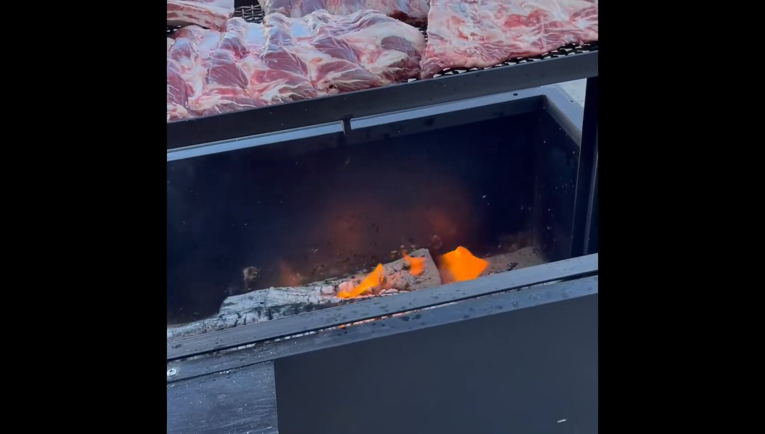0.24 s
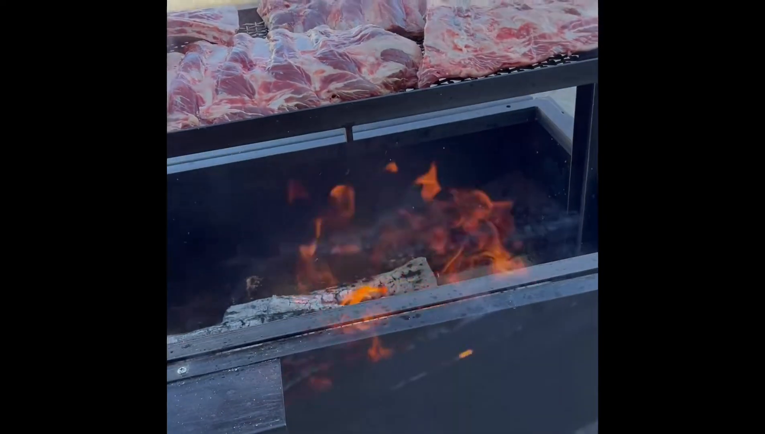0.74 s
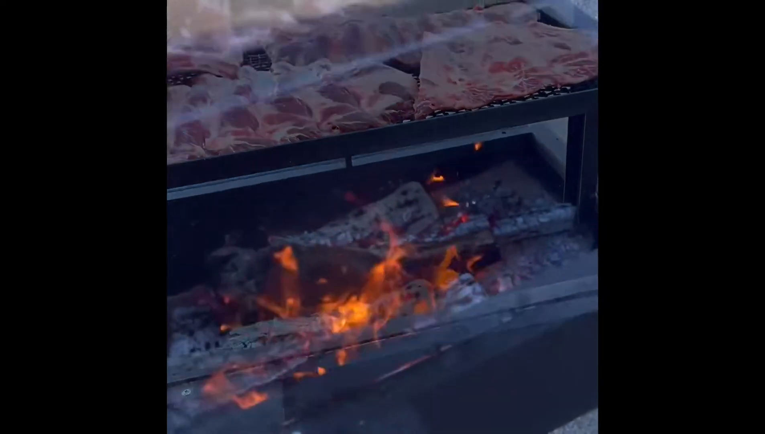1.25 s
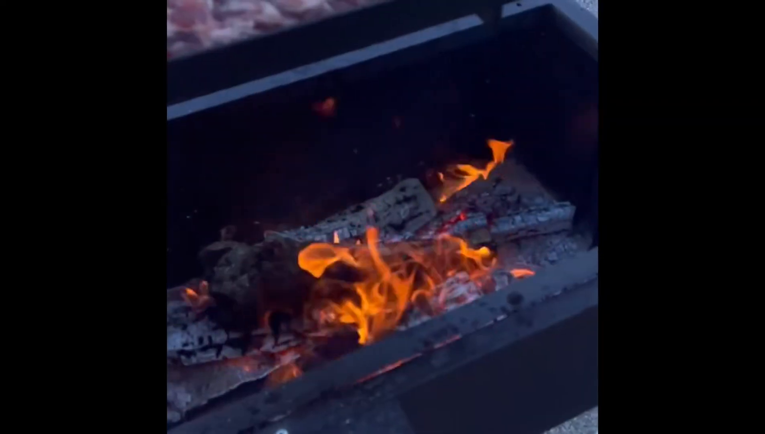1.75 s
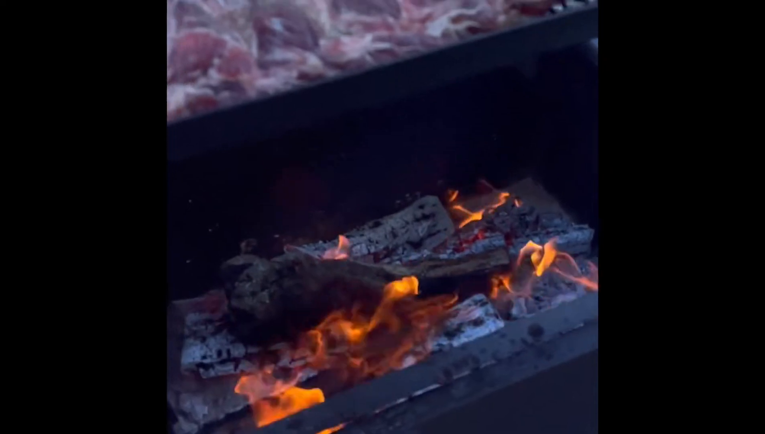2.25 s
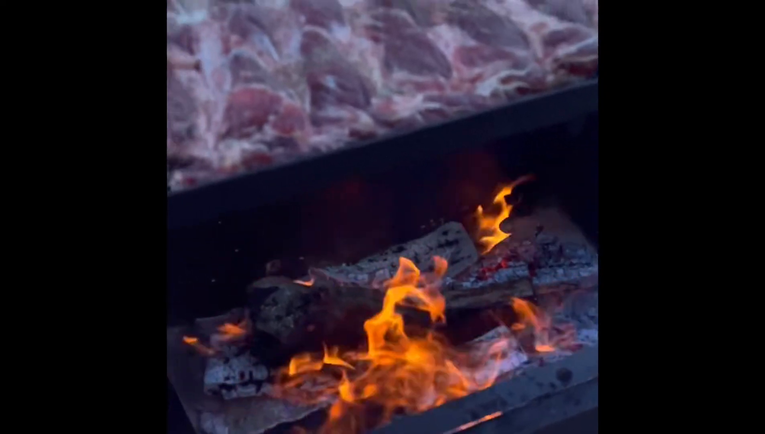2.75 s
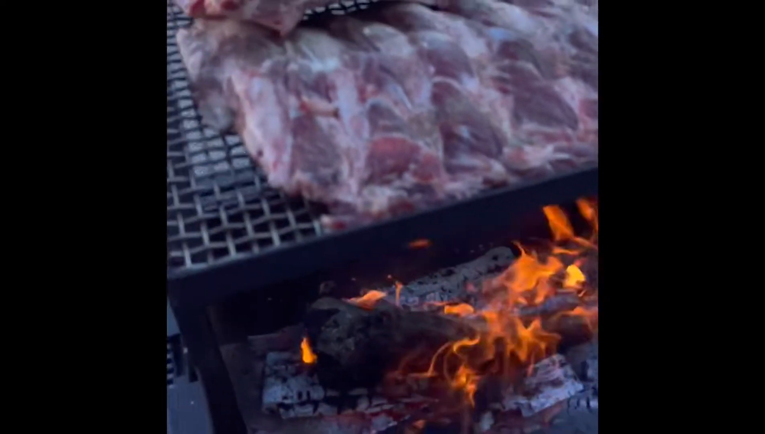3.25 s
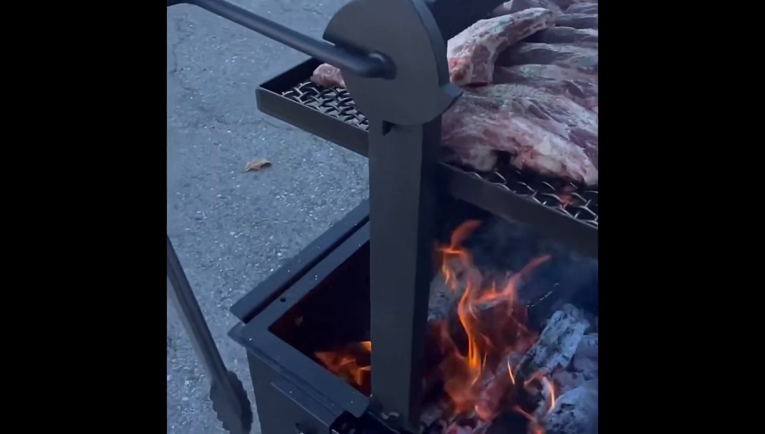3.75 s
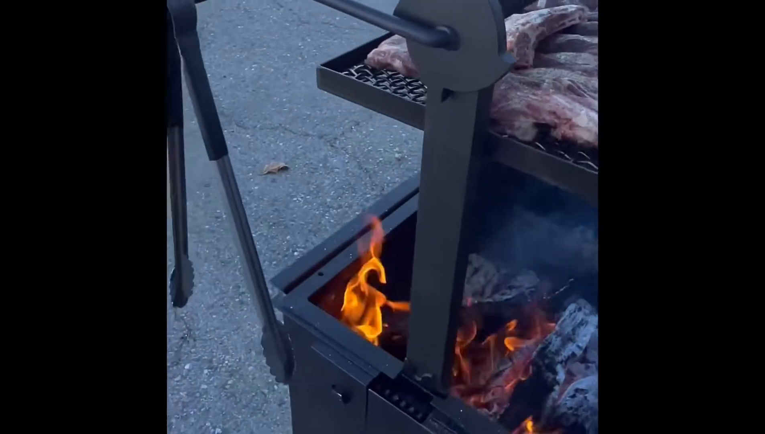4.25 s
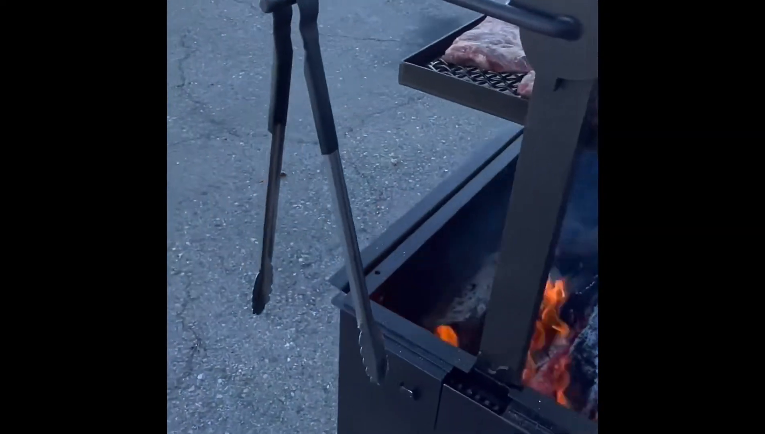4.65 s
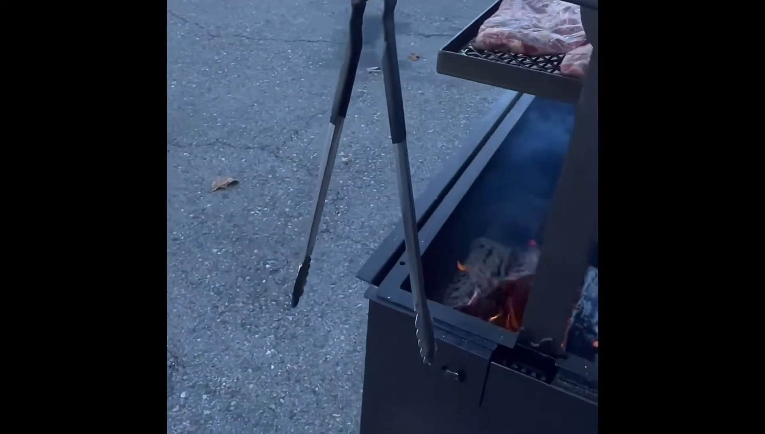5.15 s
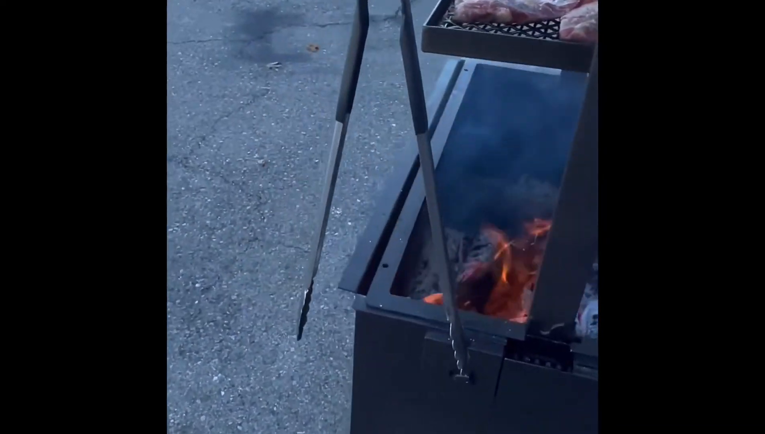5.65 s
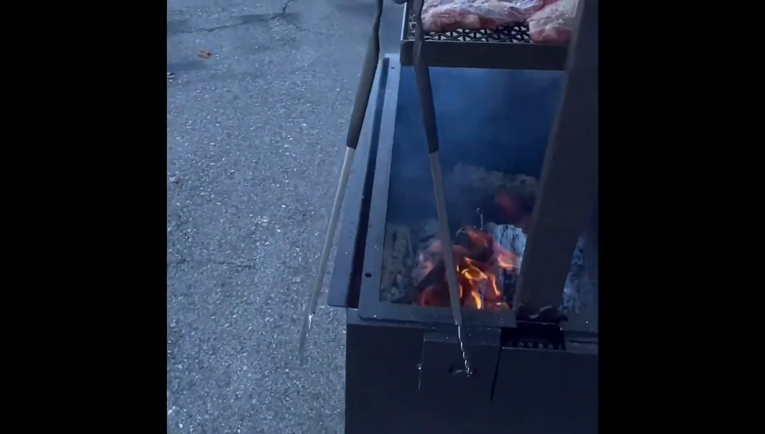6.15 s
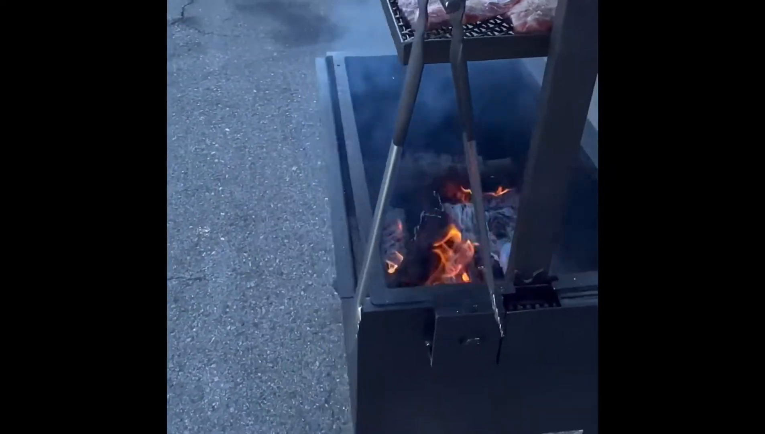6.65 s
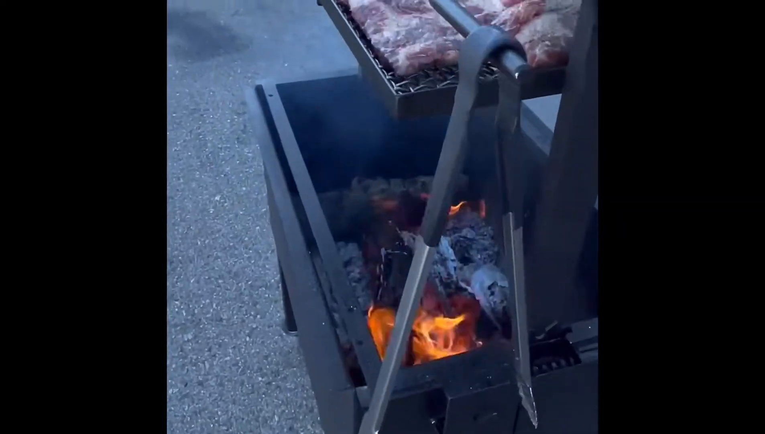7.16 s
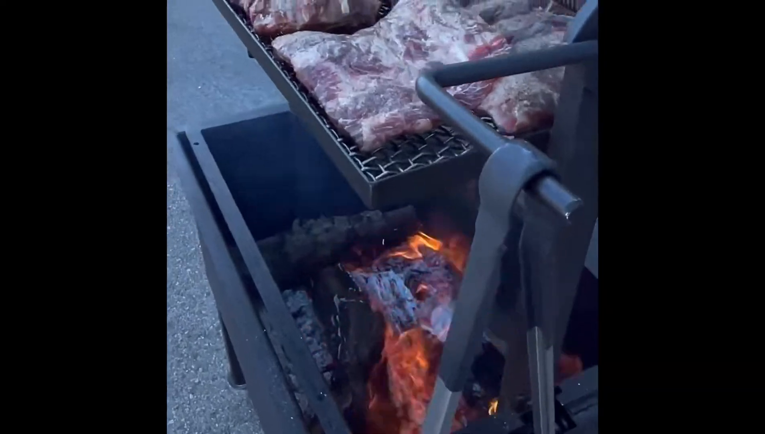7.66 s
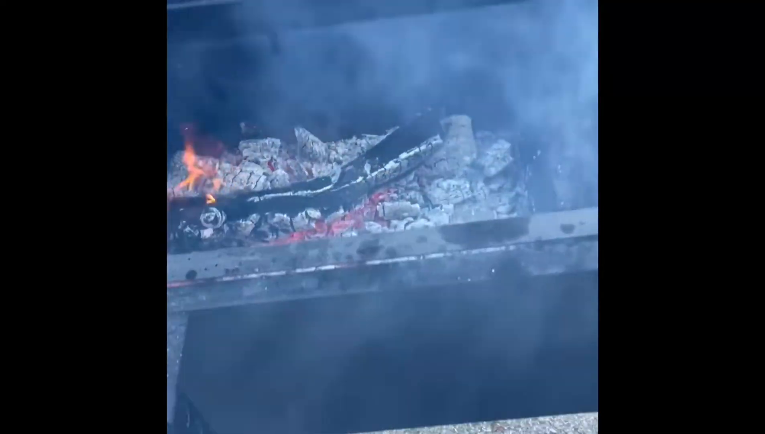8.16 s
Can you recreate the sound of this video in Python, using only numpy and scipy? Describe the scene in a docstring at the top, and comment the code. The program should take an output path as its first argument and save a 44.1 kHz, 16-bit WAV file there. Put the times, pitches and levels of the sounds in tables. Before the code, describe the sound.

Low rumbling flames and a soft draught roar underlie bright, dry wood snaps, tiny ember ticks and a fine hiss. Early crackling is busy; flapping flames follow, with thin gas whistles, a clatter of woody knocks and a quick sizzling spit. Heard close outdoors, first in front, then beside the fire with airier background, finally in front again as the rumble surges. Steel walls add short, faint echoes.

```python
"""A low rumble of flames, a fine hiss and sharp snaps open the sound of logs burning in a steel firebox outdoors.
Shaped noise makes the rumble, the roar, the hiss of sap and fat and the wash of air; swelling noise
and a falling tone make each flap of flame. Impulses and noise bursts through band filters make snaps and knocks,
random taps the ring of the steel; gliding tones make gas whistles and squirts. The listening point switches
at once from the front to the side, later back, which alters the stereo image and the air level."""
import sys
import numpy as np
from scipy import signal
from scipy.fft import rfft, irfft
from scipy.io import wavfile
from scipy.ndimage import uniform_filter1d

SR = 44100
rng = np.random.default_rng(int(sys.argv[2]) if len(sys.argv) > 2 else 0)


def wrap_up_sound(samples):
    """Save the sound to the file named by the first command line argument, as 16-bit audio."""
    columns = np.atleast_2d(samples).T
    # keep every value between -1 and 1, then stretch to whole-number steps
    tamed = np.clip(columns, -1, 1)
    steps = np.round(tamed * 32767).astype(np.int16)
    wavfile.write(sys.argv[1], SR, steps)


N = 370440
TIME = np.arange(N) / SR

# Open air, slow swells: (time [s], level in front of the fire [dB])
BREEZE = [(0, -58.5), (1.25, -61), (2.8, -59.5), (4.2, -59.5), (7.0, -59), (8.4, -60.5)]
# Open air, relative spectrum: (frequency [Hz], density [dB per Hz])
AIR_SPECTRUM = [(100, -4), (300, 1), (550, -3), (1000, -3), (1600, -11), (2400, -11.5), (3500, -14),
                (5500, -16), (8000, -14.5), (12000, -12), (14000, -60)]
# Air rushing briefly through the logs: (time of the centre [s], half length [s], level [dB])
RUSHES = [(6.618, .03, -58), (6.769, 0.011, -57), (6.881, 0.028, -51.5), (7.038, 0.032, -56),
          (7.82, 0.036, -55)]
# That rush, relative spectrum: (frequency [Hz], density [dB per Hz])
RUSH_SPECTRUM = [(250, -6), (600, 5), (1100, -3.5), (2000, -8.5), (4000, -8), (6000, -13), (12000, -38)]
# Gas whistling through cracks:
# (time [s], length [s], first pitch [Hz], last pitch [Hz], level [dB], roughness [0-1])
WHISTLES = [(1.898, 0.073, 3850, 3520, -68, .45), (2.117, 0.058, 3900, 2930, -68, 0.5),
            (2.235, 0.038, 3950, 3500, -69, .5), (2.282, .075, 3250, 2660, -70, 0.3),
            (2.93, .07, 3480, 3100, -75, .7), (7.906, 0.11, 4870, 3600, -68.5, 1)]
# Bursting gas pockets: (time [s], first pitch [Hz], last pitch [Hz], time constant of the fall [s],
# time constant of the fade [s], level before the common gain in squirts() [dB])
SQUIRTS = [(2.662, 5060, 324, .0009, 0.0085, -41), (2.8108, 3850, 109, 0.0019, 0.0038, -35)]
# Shifting log knocking its neighbours:
# (time [s], level over 5 ms [dB], length scale of the push [s], main ring [Hz])
KNOCKS = [(2.67, -48.5, 0.0036, 1810), (2.7917, -46.5, 0.0011, 1690), (2.815, -51, 0.0066, 1640),
          (2.858, -49, .0045, 1780), (2.862, -50, 0.0015, 1920), (2.883, -54, .003, 1940),
          (2.889, -44, 0.003, 1880)]
# Modes of the log: (multiple of the main ring [ratio], bandwidth [Hz], relative level [dB])
LOG_MODES = [(.5, 500, -8), (1, 420, 0), (1.33, 400, -7), (2.1, 1500, -10), (4.4, 5000, -11)]
# Boiling sap: (time [s], level [dB])
BOIL = [(0, -54.5), (.45, -51), (.9, -60), (1.35, -67.5), (2.1, -63.5), (3.15, -66.5), (3.45, -58),
        (3.75, -60.5), (4.6, -59), (5.9, -59.5), (6.7, -69.5), (7.6, -69), (8.4, -72)]
# Hiss of the sap, relative spectrum: (frequency [Hz], density [dB per Hz])
SIZZLE_SPECTRUM = [(600, -14), (1800, -12), (3000, -13), (5000, -16), (6500, -4), (7700, -12), (8600, 1.5),
                   (10800, 1.5), (12000, -4), (12350, -13), (13050, -3.5), (13350, -38), (16000, -41)]
# Bursting bubbles, relative spectrum: (frequency [Hz], density [dB per Hz])
BUBBLE_SPECTRUM = [(700, -11), (1800, -8), (3000, -4.5), (5000, -5.5), (6500, -2), (10500, 2), (12000, 9.5),
                   (13000, -11), (16000, -33)]
# Fat flashing to steam: (start [s], rise [s], hold [s], top level [dB], fade [dB per s])
SPITS = [(.27, 0.054, .26, -52, 70), (3.26, 0.032, 0.026, -39.5, 144)]
# Steam, relative spectrum: (frequency [Hz], density [dB per Hz])
STEAM_SPECTRUM = [(150, 0.5), (450, 1.5), (1300, -15), (2300, -4), (4000, -12), (7500, -14), (9000, -1.5),
                  (11000, 2), (12000, -5), (12500, -5), (15000, -38)]
# Spitting droplets, relative spectrum: (frequency [Hz], density [dB per Hz])
DROPLET_SPECTRUM = [(300, -2), (1300, -2.5), (2400, -3.5), (4000, -9), (7500, -7), (10500, 4), (12000, 3),
                    (14000, -29)]
# Wood snaps at set times, loud and faint: (time [s], level over 5 ms [dB], length scale [s],
# ring of the splinter [Hz], woody body relative to the treble snap [dB])
POPS = [(0.062, -48, .002, 9100, -3), (0.134, -45, 0.0061, 9600, -3), (0.144, -46, 0.0046, 10000, -4),
        (0.206, -44, 0.0012, 9600, -13), (.292, -47, 0.0023, 9660, -18), (0.312, -40, .004, 10300, -28),
        (0.318, -39, 0.0048, 9800, -26), (0.34, -45, 0.0033, 10100, -20), (.386, -39.5, .003, 10500, -33),
        (0.424, -39.5, 0.0051, 10600, -14), (0.491, -40.5, 0.0055, 10300, -10),
        (0.615, -44, .003, 7000, -13), (0.6397, -33, 0.0016, 7040, -15.5),
        (0.712, -44.5, 0.0036, 7500, -12), (0.7186, -41.5, 0.0029, 9600, -7),
        (0.942, -46, 0.0014, 10400, -3), (1.089, -48.5, 0.0035, 10700, -1),
        (1.411, -46.5, 0.0021, 10000, -6), (1.651, -50.5, 0.0026, 4200, -9),
        (1.6867, -32.5, 0.0016, 7700, -14.5), (1.728, -48.5, .0021, 5900, -6),
        (1.81, -49.5, 0.0016, 4300, -4), (1.829, -51, 0.00071, 6860, -8), (1.854, -57, .002, 4200, -7),
        (1.88, -55, .0016, 7500, -14), (1.899, -45.5, 0.0013, 5840, 6), (1.946, -55, 0.0019, 6500, -11),
        (1.989, -57, .001, 7160, -11), (1.992, -51, 0.0038, 7300, 0), (2.029, -47.5, 0.0015, 6700, -17),
        (2.203, -49.5, 0.0017, 7000, -5), (2.261, -51.5, .002, 10500, -22),
        (2.373, -54, 0.0026, 10100, -16), (2.442, -48.5, 0.0054, 6700, -27),
        (2.515, -48.5, 0.0039, 9800, -27), (2.67, -45, 0.0054, 8900, -10), (2.696, -44, 0.0033, 9630, -15),
        (2.702, -39.5, 0.0031, 9450, -13), (2.97, -58, .001, 10600, -18), (2.998, -46, 0.0025, 9900, -18),
        (3.132, -44.5, 0.0011, 11100, -8), (3.231, -57, .001, 6500, -14), (3.347, -52, .0015, 2400, 11),
        (3.519, -53, .0015, 11400, -9), (3.546, -51, .0012, 9700, -20), (3.574, -51, .0012, 9700, -18),
        (3.62, -50.5, 0.0017, 11000, -23), (3.675, -47.5, 0.0012, 10400, -13),
        (4.023, -47.5, 0.004, 6950, -12), (4.07, -51, .0015, 11400, -11), (4.718, -48, .0015, 11300, -22),
        (5.197, -50, 0.0013, 11400, -18), (4.81, -41, 0.003, 10960, -23), (5.131, -43.5, 0.012, 8900, 0),
        (5.4957, -41, 0.00022, 9600, -2), (5.542, -34.5, 0.0019, 10060, -11.5),
        (5.564, -45.5, 0.0035, 3900, 4), (5.579, -49.5, 0.003, 4000, 1), (5.7217, -43.5, 0.0014, 9400, -2),
        (5.728, -46, .002, 4500, -6), (5.7323, -37.5, 0.0015, 4300, -4), (5.7387, -42, .0016, 4230, 0),
        (5.752, -46.5, .0035, 4200, -4), (5.775, -50, .003, 11000, -3), (5.79, -51, .0018, 4180, -8),
        (5.8373, -41.5, 0.00033, 6640, -7), (6.104, -53, 0.0015, 6200, 6), (6.144, -52.5, 0.0019, 6300, 9),
        (6.358, -55, 0.0018, 6200, -10), (6.312, -44, 0.011, 9300, 2), (6.3865, -47, 0.0016, 6260, -9),
        (6.5094, -42.5, 0.0031, 6500, 5), (6.5136, -47, 0.0035, 2580, 6), (6.582, -46, 0.009, 10500, -3),
        (7.088, -38, 0.0016, 11400, -36), (7.16, -48, 0.0025, 4300, -4), (7.487, -49, 0.0051, 11200, -32),
        (7.607, -51, 0.0018, 8060, -18), (7.685, -49.5, 0.0018, 8400, -16), (7.715, -56, .003, 4300, 6),
        (7.747, -52, .004, 4340, 16), (7.77, -37.5, 0.0018, 10550, 2), (8.059, -44, 0.0025, 8900, -9)]
# Flapping flames: (time of the peak [s], level at the peak [dB], half length scale [s],
# edge scale of the flutter [Hz], pitch of the thud at the peak [Hz])
FLAPS = [(1.058, -38.5, 0.0039, 450, 229.8), (1.335, -34.5, 0.0056, 397, 115),
         (1.362, -47, .012, 418, 130.7), (1.427, -38.5, 0.016, 380, 70.5), (1.467, -38.5, 0.012, 614, 330),
         (1.484, -35.5, 0.02, 364, 62.7), (1.626, -51, 0.0065, 520, 330), (1.949, -47, .007, 230, 80),
         (1.992, -41.5, 0.0078, 326, 94.9), (2.135, -45.5, .012, 410, 150.6), (2.18, -39, .012, 159, 68),
         (2.263, -37, 0.0077, 95, 60.2), (2.326, -46, .005, 480, 189.4), (2.365, -47.5, .005, 420, 241),
         (2.45, -50.5, 0.014, 470, 260), (2.535, -41, 0.013, 129, 62.1), (3.374, -44, .023, 130, 55.8),
         (3.775, -31, 0.0049, 400, 84.6), (3.805, -40, .005, 330, 160), (3.916, -37, 0.017, 337, 65),
         (3.946, -35, .009, 118, 63.5), (4.009, -46, .008, 382, 110), (4.082, -34.5, .013, 90, 58.1),
         (4.129, -37, .004, 328, 210.2), (4.17, -49, .012, 395, 150), (4.395, -47, 0.0052, 680, 340),
         (4.885, -46, 0.01, 270, 150.2), (4.936, -37, 0.011, 215, 88), (5.073, -43.5, 0.021, 110, 64.8),
         (5.413, -50, 0.0034, 640, 450), (5.58, -35.5, 0.016, 248, 100), (5.613, -44, .007, 130, 70.3),
         (5.677, -44.5, .012, 109, 63.4), (6.189, -42, 0.0098, 270, 159.2), (6.212, -43, .008, 200, 100.1),
         (6.443, -37.5, 0.0053, 230, 137), (6.51, -39.5, 0.013, 221, 80.2), (6.537, -41, .009, 110, 60.2),
         (6.88, -42.5, 0.02, 400, 240), (6.915, -43, .008, 230, 140.2), (7.049, -34.5, .011, 302, 80.5),
         (7.35, -42.5, 0.0095, 356, 149.4), (7.499, -44.5, 0.011, 128, 52.7),
         (7.651, -43.5, .0082, 120, 52), (7.936, -37, 0.011, 173, 70.4)]
# Deep turbulence of the flames: (time [s], level [dB])
TURBULENCE = [(0, -51), (.3, -51.5), (.55, -52), (1.2, -52), (1.6, -50.5), (2.4, -53), (2.7, -55.5),
              (3.15, -58), (3.45, -48.5), (4.4, -56.5), (5.0, -52.5), (6.05, -57), (6.35, -54),
              (7.85, -54.5), (8.05, -43), (8.4, -45.5)]
# Deep turbulence, relative spectrum: (frequency [Hz], density [dB per Hz])
RUMBLE_SPECTRUM = [(15, -32), (30, -32), (43, 0.5), (60, 7.5), (85, 8), (120, -1.5), (200, -15.5),
                   (400, -76)]
# Draught through the logs: (time [s], level before the common gain in flames() [dB], pitch of its roar [Hz])
DRAUGHT = [(0, -54.5, 154), (.16, -50.5, 142), (.9, -51, 151), (1.3, -55, 149), (1.8, -58, 163),
           (2.3, -56, 166), (2.93, -59, 193), (3.11, -47.5, 166), (3.25, -48.5, 157), (3.42, -47.5, 138),
           (3.68, -49.5, 164), (3.9, -56.5, 162), (4.58, -59.5, 164), (4.73, -55.5, 159), (5.1, -54.5, 166),
           (5.4, -51, 174), (5.85, -58, 162), (6.3, -51.5, 177), (6.65, -59, 161), (7.85, -57, 159),
           (8.0, -46.5, 161), (8.4, -48.5, 149)]
# Roar at its rest pitch, relative spectrum: (frequency [Hz], density [dB per Hz])
ROAR_SPECTRUM = [(60, -35), (105, -14), (140, -1.5), (175, -3), (230, -8.5), (300, -15.5), (450, -29),
                 (800, -27), (2000, -64)]
# Left-right likeness in front of the fire, limited to 1: (frequency [Hz], correlation [-1 to 1])
LIKENESS_FRONT = [(100, 0.82), (400, 0.72), (800, 0.23), (1600, 1), (2300, 1), (3200, 0.38), (4400, 0.85),
                  (4900, 1), (6200, 0.85), (7600, 0.72), (9500, 0.7), (10600, 0.72), (13000, 0.85)]
# Left-right likeness beside the grill: (frequency [Hz], correlation [-1 to 1])
LIKENESS_BESIDE = [(280, 1), (600, -0.089), (1100, -0.34), (1900, 0.6), (2900, -0.7), (3700, 0.59),
                   (4400, 0.62), (4900, 1), (6300, 0.8), (7600, 0.95), (8700, 0.086), (9600, 0.49),
                   (10400, -0.071), (12500, 0.45)]
# Brief dips in level: (time of the centre [s], depth [dB], half length [s])
DIPS = [(2.599, 22, 0.0083), (3.719, 19, 0.013), (7.891, 11, 0.018)]
# Gain on the difference between the two microphone ports: (frequency [Hz], gain [dB])
PORT_WIDTH = [(1200, -2), (1850, -5), (2500, 1), (5100, -2), (5600, -21), (6300, -7), (7000, 9.5),
              (8400, 3.5), (9400, -4), (10400, 2)]
# Phase lag of the right port behind the left: (frequency [Hz], lag [turns])
PORT_TURNS = [(2400, 0), (3800, .08), (4400, .21), (4800, .48), (5050, .53), (5500, 1), (6400, 1),
              (7700, 1.3), (8000, 1), (11000, 1), (11900, 1.1), (12450, 1.5), (12900, 1.92), (13200, 2)]

BESIDE_FROM_S, BESIDE_TO_S = 3.72, 7.89
AIR_BESIDE_DB = 6  # nothing shields the open air beside the grill
AIR_LEFT_DB = 1.5  # beside the grill, left above right
CRACK_DB, CRACK_PER_BODY = 0.5, 0.66  # mid-range crack grows with the woody body: dB, dB per dB
# Faint snaps: mean rate, then the ranges of the columns of POPS after the time
FAINT_PER_S = 9
FAINT_DB, FAINT_LENGTH_S = (-58.5, -54.5), (0.00047, 0.0029)
FAINT_RING_HZ, FAINT_BODY_DB = (5550, 12050), (-24, -10)
FLAP_WIDTH_FRONT, FLAP_WIDTH_BESIDE = 0.72, 0.018  # side-to-shared ratio: wide when the flames are close
FLAP_RIGHT_DB = 2.5  # from the front the flames lean right: right above left
FLAP_FALL_OCTAVES = 0.55  # the thud falls from this far above its pitch to this far below
FLAP_SKEW, FLAP_EDDY_LEAD = 0.22, 0.22  # slower death than start; lead of the eddies, in stretched half lengths
ROAR_REST_HZ = 160  # pitch at which the roar has its listed spectrum
# Hollow of the firebox: a narrow resonance, steady at first, then slowly fading
HOLLOW_HZ, HOLLOW_WIDTH_HZ, HOLLOW_DB = 502.5, 60, -67
HOLLOW_UNTIL_S, HOLLOW_FADE_DB_PER_S = 0.49, 5.5
EDGE_HZ = 15800  # upper band limit


def gain_of(db):
    """Logarithmic level: decibels become an amplitude ratio."""
    return 10 ** (np.asarray(db) / 20)


def evened(x):
    """Energy normalisation: scales to an rms of 1."""
    return x / np.sqrt(np.mean(x ** 2) + 1e-20)


def read(points, hz):
    """Logarithmic pitch scale: interpolates a spectrum on a log-frequency axis."""
    f, value = np.transpose(points)
    return np.interp(np.log(hz + 1), np.log(f), value)


def follow(points, t=TIME):
    """Linear interpolation: reads a curve in time."""
    s, value = np.transpose(points)
    return np.interp(t, s, value)


def add(mix, s, sound):
    """Superposition: adds a stereo sound to the mix at time s."""
    part = mix[:, max(round(s * SR), 0):][:, :sound.shape[1]]
    part += sound[:, :part.shape[1]]


def band(x, low_hz, high_hz, order=2):
    """Resonance: a causal band-pass."""
    edges = [low_hz, min(high_hz, .48 * SR)]
    return signal.sosfilt(signal.butter(order, edges, "band", fs=SR, output="sos"), x)


def band_around(x, hz, width_hz):
    """Resonance: a causal band-pass centred on a frequency."""
    return band(x, hz - width_hz / 2, hz + width_hz / 2)


def coloured(x, spectrum):
    """Linear filtering: weights a sound by a spectrum, at an rms of 1."""
    weights = gain_of(read(spectrum, np.fft.rfftfreq(N, 1 / SR)))
    return evened(irfft(rfft(x) * weights, N))


def pair(x, width):
    """Mid-side stereo: left and right from a shared signal x[0] and a side signal x[1]."""
    return np.array([x[0] + width * x[1], x[0] - width * x[1]])


def is_beside(t):
    """Position of the listener: true beside the grill, false in front of the fire."""
    return (t > BESIDE_FROM_S) & (t < BESIDE_TO_S)


def noise(spectrum, patchy_db, flicker_db, size=1024, pitch=None):
    """Short-time spectral synthesis: partly correlated stereo noise with drifting patches and a shared flicker."""
    hop, hz = size // 4, np.fft.rfftfreq(size, 1 / SR)
    t = np.arange(N // hop + 5) * hop / SR
    a, b, c, d, patches = rng.standard_normal((5, len(t), len(hz)))
    patches = uniform_filter1d(patches, size=10, axis=0)  # smooth in time
    patches = evened(uniform_filter1d(patches, size=12, axis=1))  # and in frequency
    flicker = evened(uniform_filter1d(rng.standard_normal(len(t)), size=5))[:, None]
    likeness = np.where(is_beside(t)[:, None], read(LIKENESS_BESIDE, hz), read(LIKENESS_FRONT, hz))
    likeness = np.clip(likeness, -1, 1)
    left = a + 1j * b
    right = likeness * left + np.sqrt(1 - likeness ** 2) * (c + 1j * d)
    slide = 1 if pitch is None else follow(pitch, t)[:, None]  # pitch ratio that moves the spectrum
    level_db = read(spectrum, hz / slide) + patchy_db * patches + flicker_db * flicker
    frames = np.array([left, right]) * gain_of(level_db)
    return evened(signal.istft(frames.swapaxes(1, 2), nperseg=size, noverlap=size - hop)[1][:, :N])


def decaying(impulses, burst_s):
    """Exponential decay: each impulse dies away with a time constant."""
    return signal.lfilter([1], [1, -np.exp(-1 / (burst_s * SR))], impulses)


def droplet_sizes(rate_per_s, spread_db):
    """Poisson process: random impulses whose level rises by up to twice the spread."""
    sizes = gain_of(spread_db * np.minimum(rng.exponential(1, N), 2))
    return sizes * (rng.random(N) < rate_per_s / SR)


def open_air():
    """Broadband ambient noise: a soft wash that swells slowly, stronger and to the left beside the grill."""
    level = gain_of(follow(BREEZE) + AIR_BESIDE_DB * is_beside(TIME))
    lean = gain_of(AIR_LEFT_DB * is_beside(TIME) * np.array([[.5], [-.5]]))
    return lean * level * noise(AIR_SPECTRUM, patchy_db=2.1, flicker_db=.9)


def rushes():
    """Jet noise: short swells of air hiss through the gaps between the logs."""
    level = sum(gain_of(db) * np.exp(-((TIME - s) / half) ** 2) for s, half, db in RUSHES)
    return level * coloured(pair(rng.standard_normal((2, N)), width=0.49), RUSH_SPECTRUM)


def whistles():
    """Jet tone: a gas pocket empties slowly, and its rough whistle falls in pitch."""
    out = np.zeros((2, N))
    for s, length, first_hz, last_hz, db, rough in WHISTLES:
        t = np.arange(int(length * SR)) / SR
        turns = np.cumsum(first_hz * (last_hz / first_hz) ** ((t / length) ** 0.76)) / SR
        a, b = evened(uniform_filter1d(rng.standard_normal((2, SR // 4)), size=110))[:, :len(t)]
        unsteady = 1 - rough + rough * (a + 1j * b)  # random amplitude and phase
        jet = (unsteady * np.exp(2j * np.pi * turns)).real
        jet = evened(jet * signal.windows.tukey(len(t), .4))
        add(out, s, gain_of(db) * np.tile(jet, (2, 1)))
    return out


def squirts(rise_s=0.0013, gain_db=3.5):
    """Frequency glide: a gas pocket bursts, its pitch collapses within milliseconds and ends as a small thump."""
    out, t = np.zeros((2, N)), np.arange(SR // 20) / SR
    for s, first_hz, last_hz, fall_s, fade_s, db in SQUIRTS:
        turns = np.cumsum(last_hz + (first_hz - last_hz) * np.exp(-t / fall_s)) / SR
        chirp = np.sin(2 * np.pi * turns) * (1 - np.exp(-t / rise_s)) * np.exp(-t / fade_s)
        add(out, s, gain_of(db + gain_db) * np.array([chirp, chirp]))
    return out


def embers(ticks_per_s=55, level_db=-71):
    """Impulsive excitation: charcoal flakes tick faintly in six bands of pitch."""
    out, pitches = np.zeros((2, N)), np.geomspace(2500, 9000, num=6)
    for hz in pitches:
        sizes = gain_of(rng.uniform(-37, 0, N)) * (rng.random(N) < ticks_per_s / len(pitches) / SR)
        bursts = decaying(sizes, burst_s=0.0047)
        out += band(pair(rng.standard_normal((2, N)) * bursts, width=0.16), 0.79 * hz, 1.25 * hz)
    return gain_of(level_db) * evened(out)


def knocks(grain=0.85):
    """Modal resonance: charred wood scrapes and knocks as a short gritty push rings the log's damped modes."""
    out, t = np.zeros((2, N)), np.arange(SR // 20) / SR
    span = np.sqrt(.005 * SR / len(t))  # the level counts over 5 ms
    for s, db, length, ring_hz in KNOCKS:
        grit = np.exp(grain * rng.standard_normal(len(t)) - t / (1.6 * length))
        push = pair(rng.standard_normal((2, len(t))), width=0.39) * grit
        ring = sum(gain_of(mode_db) * evened(band_around(push, k * ring_hz, width_hz))
                   for k, width_hz, mode_db in LOG_MODES)
        add(out, s, gain_of(db) * span * evened(ring))
    return out


def sizzle(ticks_per_s=430, clump_db=4, clump_s=0.013, hiss_db=-0.25, crackle_db=-3):
    """Boiling noise: sap leaves the logs in a fine hiss and in clumps of tiny, sharply ticking bubbles."""
    hiss = noise(SIZZLE_SPECTRUM, patchy_db=2.2, flicker_db=1.6, size=512)
    drift = evened(uniform_filter1d(rng.standard_normal(N), size=int(clump_s * SR)))
    rate = ticks_per_s * gain_of(clump_db * drift)
    bursts = decaying(droplet_sizes(rate, spread_db=9), burst_s=0.00036)
    ticks = coloured(pair(rng.standard_normal((2, N)) * bursts, width=0.1), BUBBLE_SPECTRUM)
    return gain_of(follow(BOIL)) * (gain_of(hiss_db) * hiss + gain_of(crackle_db) * ticks)


def spit(ticks_per_s=1100, crackle_db=-2):
    """Flash boiling: fat hits the embers and leaves in a short hiss packed with bursting droplets."""
    level = np.zeros(N)
    for s, rise, hold, db, fade in SPITS:
        fade_db = fade * np.maximum(TIME - s - rise - hold, 0)
        level += np.clip((TIME - s) / rise, 0, 1) * gain_of(db - fade_db)
    bursts = decaying(droplet_sizes(ticks_per_s, spread_db=4), burst_s=0.00043)
    droplets = coloured(pair(rng.standard_normal((2, N)) * bursts, width=0.086), DROPLET_SPECTRUM)
    steam = noise(STEAM_SPECTRUM, patchy_db=2.5, flicker_db=0.2, size=256)
    return level * evened(steam + gain_of(crackle_db) * droplets)


def faint_pops():
    """Random sampling: small snaps at random moments, each with its own size and colour."""
    ranges = [(0, N / SR), FAINT_DB, FAINT_LENGTH_S, FAINT_RING_HZ, FAINT_BODY_DB]
    low, high = np.transpose(ranges)
    return (low + (high - low) * rng.random((round(FAINT_PER_S * N / SR), len(low)))).tolist()


def pops(first_crack=6, grain=0.89, ring_db=-4, ring_width_hz=1000):
    """Brittle fracture: steam splits the wood with one sharp crack, then fibres tear and the splinter rings."""
    out, t = np.zeros((2, N)), np.arange(SR // 20) / SR
    span = np.sqrt(.005 * SR / len(t))  # the level counts over 5 ms
    for s, db, length, ring_hz, body_db in POPS + faint_pops():
        fibres = pair(rng.standard_normal((2, len(t))), width=0.23)
        fibres = fibres * np.exp(grain * rng.standard_normal(len(t)))
        tearing = (1 - np.exp(-t / (0.54 * length))) * np.exp(-t / (2.13 * length))
        tear = fibres * tearing + first_crack * signal.unit_impulse(len(t), SR // 2000)
        body = gain_of(body_db) * evened(band(tear, 1110, 3800))
        crack = gain_of(CRACK_DB + CRACK_PER_BODY * body_db) * evened(band(tear, 3330, 5400))
        snap = evened(band(tear, 7400, 12000, order=3))
        ring = evened(band_around(tear, ring_hz, ring_width_hz))
        sound = evened(body + crack + snap) + gain_of(ring_db) * ring
        add(out, s, gain_of(db) * span * evened(sound))
    return out


def firebox(x, t60=0.17, first_s=0.0035):
    """Reverberation: the steel walls return each snap as random echoes that fall 60 dB in t60 seconds."""
    t = np.arange(SR // 3) / SR
    taps = rng.standard_normal((2, len(t))) * (rng.random((2, len(t))) < 3000 / SR)
    tail = pair(taps, width=0.29) * gain_of(-60 * t / t60) * (t > first_s)
    return signal.fftconvolve(x, tail / np.linalg.norm(tail[0]), axes=1)[:, :N]


def flaps(thud_db=2.0):
    """Vortex shedding: a tongue of flame tears off with a flutter of eddies and a soft thud that falls in pitch."""
    out, t = np.zeros((2, N)), np.arange(-SR // 8, SR // 8) / SR
    for s, db, half, edge_hz, thud_hz in FLAPS:
        width, right_db = (FLAP_WIDTH_BESIDE, 0) if is_beside(s) else (FLAP_WIDTH_FRONT, FLAP_RIGHT_DB)
        age = t / (1.02 * half * (1 + FLAP_SKEW * np.sign(t)))  # in stretched half lengths
        swell = np.exp(-.5 * age ** 2)
        turns = np.cumsum(thud_hz * 2 ** (-FLAP_FALL_OCTAVES * np.tanh(age))) / SR
        thud = evened(np.cos(2 * np.pi * (turns + rng.random())) * swell)
        eddies = band(pair(rng.standard_normal((2, len(t))), width), 41, max(0.903 * edge_hz, 70), order=8)
        flutter = evened(eddies * np.exp(-.5 * (age + FLAP_EDDY_LEAD) ** 2))
        lean_db = right_db * np.array([[-.5], [.5]])
        level = gain_of(db + lean_db) * np.sqrt(np.mean(swell ** 2))  # so that db holds at the peak
        add(out, s + t[0], level * evened(gain_of(thud_db) * thud + flutter))
    return out


def hollow():
    """Cavity resonance: stirred air sounds in a narrow band within the firebox, then slowly fades."""
    stir = pair(rng.standard_normal((2, N)), width=0.76)
    level_db = HOLLOW_DB - HOLLOW_FADE_DB_PER_S * np.maximum(TIME - HOLLOW_UNTIL_S, 0)
    return gain_of(level_db) * evened(band_around(stir, HOLLOW_HZ, HOLLOW_WIDTH_HZ))


def flames(roar_gain_db=2.0):
    """Turbulent combustion: burning gas rumbles, and the draught roars at a wandering pitch."""
    rumble = noise(RUMBLE_SPECTRUM, patchy_db=1.0, flicker_db=3, size=4096)
    draught_db = [(s, db) for s, db, hz in DRAUGHT]
    pitch = [(s, hz / ROAR_REST_HZ) for s, db, hz in DRAUGHT]
    roar = noise(ROAR_SPECTRUM, patchy_db=1.5, flicker_db=1.06, size=4096, pitch=pitch)
    return gain_of(follow(TURBULENCE)) * rumble + gain_of(follow(draught_db) + roar_gain_db) * roar


def scene():
    """Superposition: the fire in its steel box, in the open air."""
    background = open_air() + rushes()
    gas = whistles() + squirts()
    snaps = embers() + knocks() + pops()
    echoes = gain_of(-12.5) * firebox(snaps)
    boiling = sizzle() + spit()
    fire = flaps() + hollow() + flames()
    return background + gas + snaps + echoes + boiling + fire


def record(dry):
    """Two-port reception: brief dips in level, the width and phase between the ports, and the band limit."""
    dip_db = sum(depth * np.exp(-((TIME - s) / half) ** 2) for s, depth, half in DIPS)
    hz = np.fft.rfftfreq(N, 1 / SR)
    left, right = rfft(dry * gain_of(-dip_db))
    left, right = pair([(left + right) / 2, (left - right) / 2], gain_of(read(PORT_WIDTH, hz)))
    right = right * np.exp(-2j * np.pi * read(PORT_TURNS, hz))
    ports = irfft(np.array([left, right]), N)
    low_pass = signal.firwin(511, EDGE_HZ, window=("kaiser", 9), fs=SR)
    return signal.oaconvolve(ports, low_pass[None], "same")


dry = scene()
out = record(dry)
wrap_up_sound(out)
```